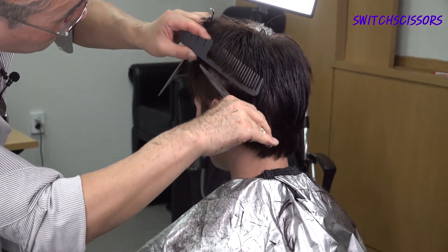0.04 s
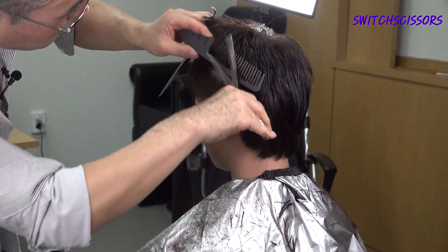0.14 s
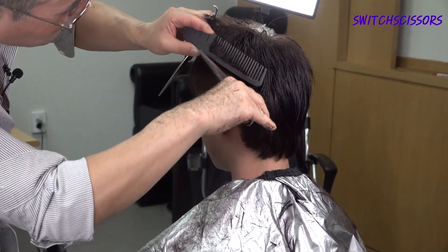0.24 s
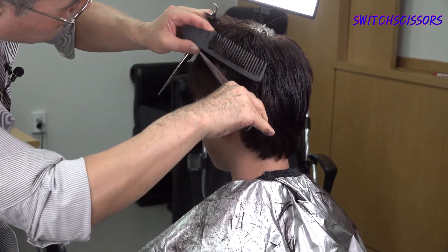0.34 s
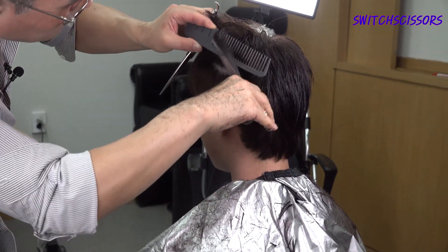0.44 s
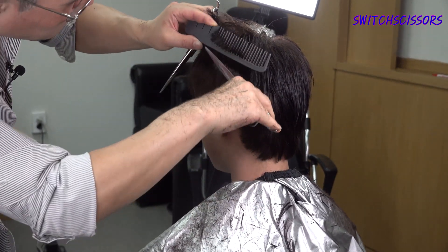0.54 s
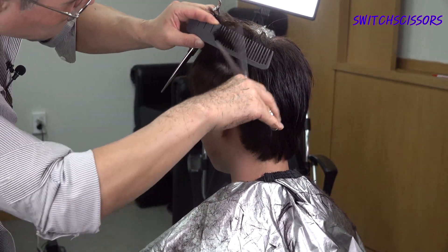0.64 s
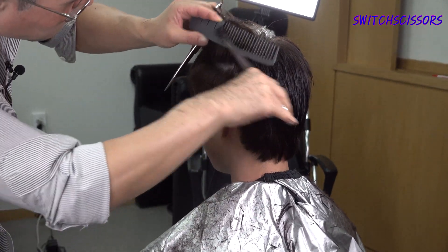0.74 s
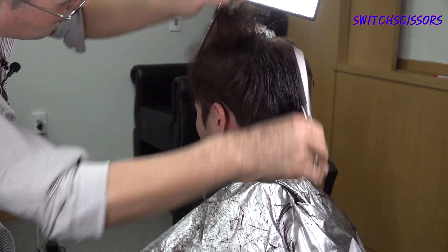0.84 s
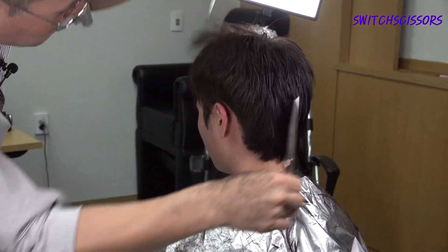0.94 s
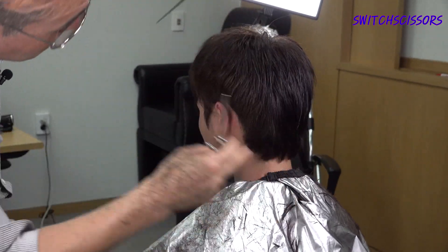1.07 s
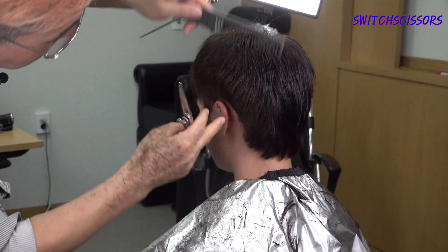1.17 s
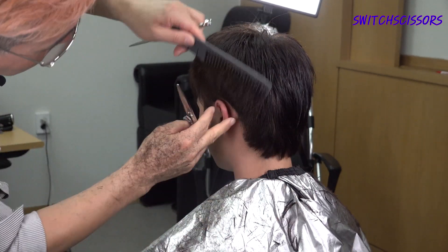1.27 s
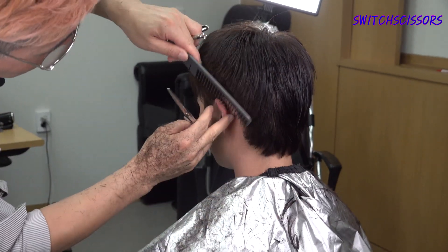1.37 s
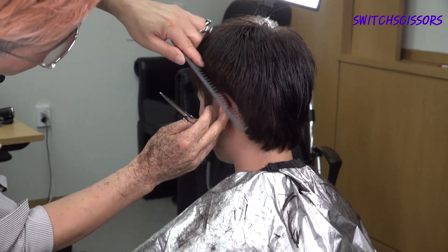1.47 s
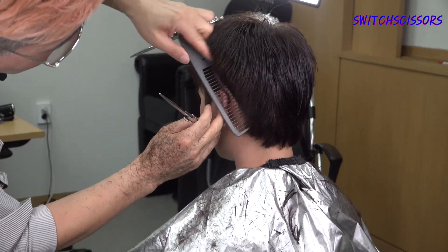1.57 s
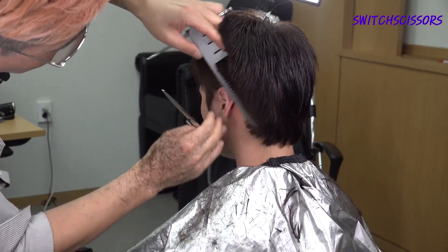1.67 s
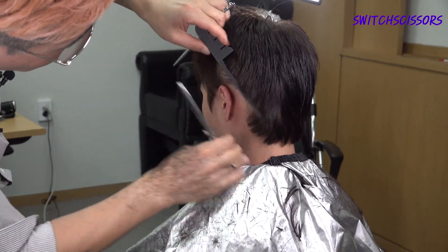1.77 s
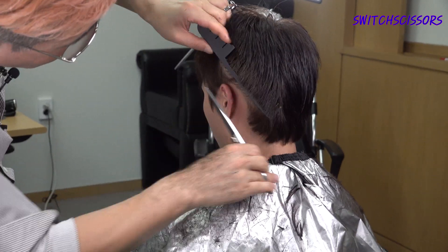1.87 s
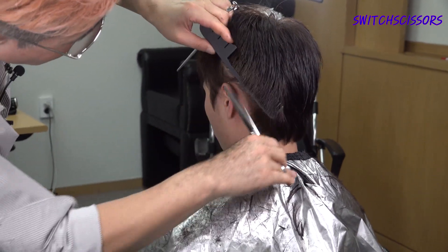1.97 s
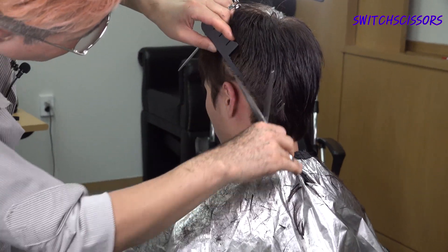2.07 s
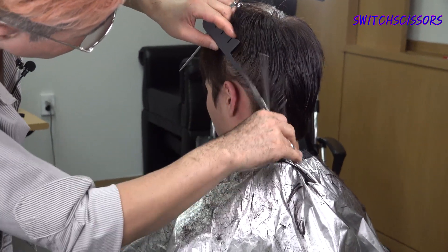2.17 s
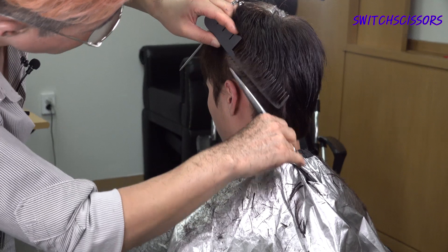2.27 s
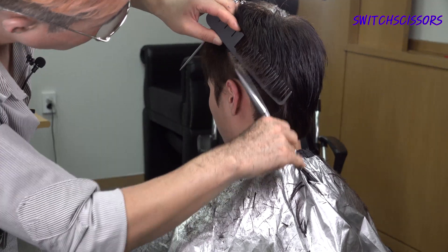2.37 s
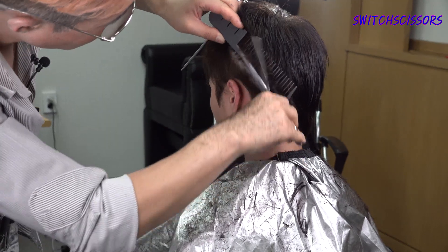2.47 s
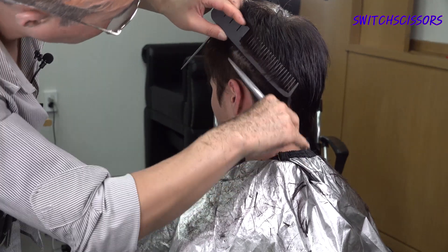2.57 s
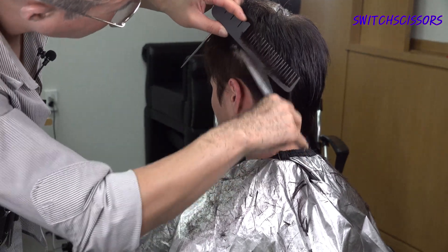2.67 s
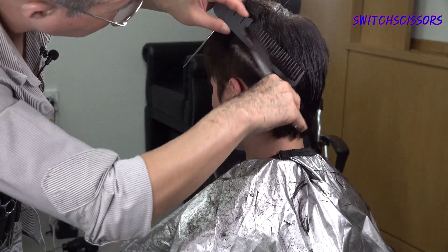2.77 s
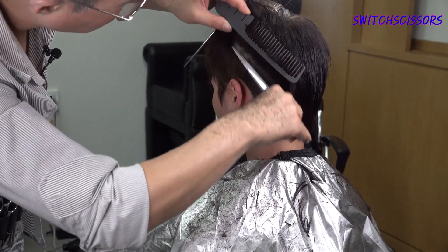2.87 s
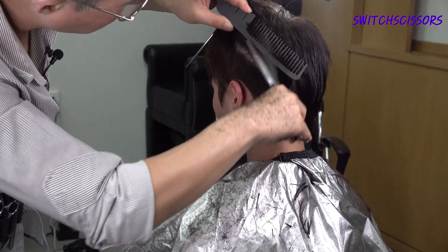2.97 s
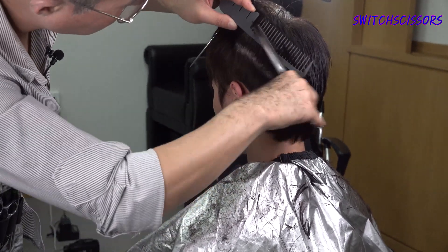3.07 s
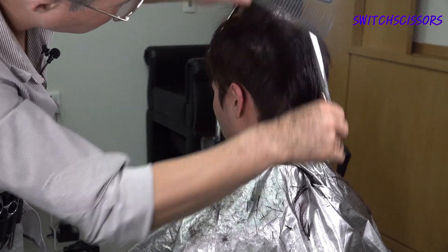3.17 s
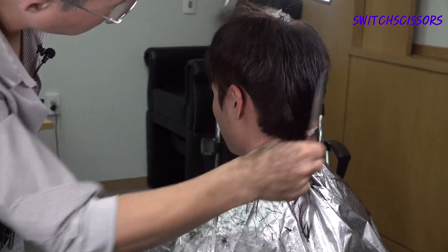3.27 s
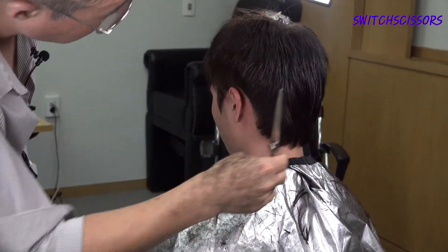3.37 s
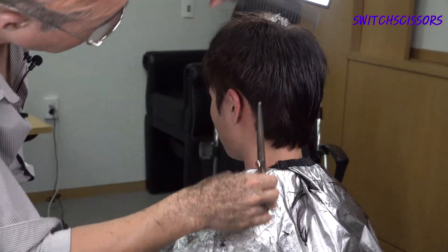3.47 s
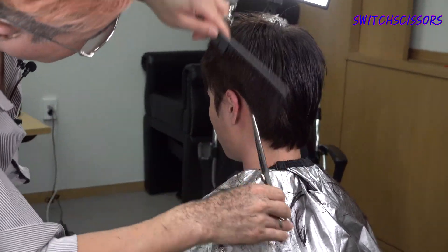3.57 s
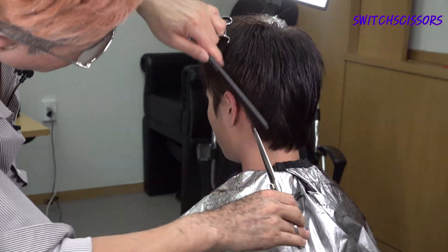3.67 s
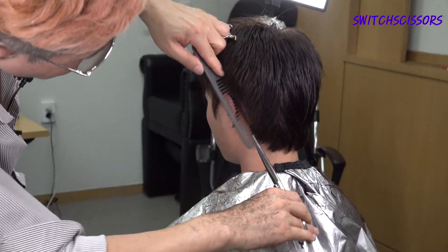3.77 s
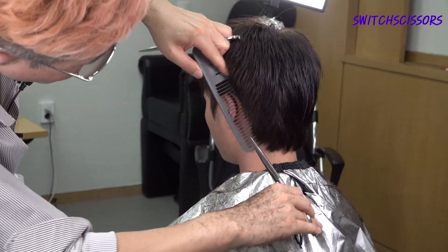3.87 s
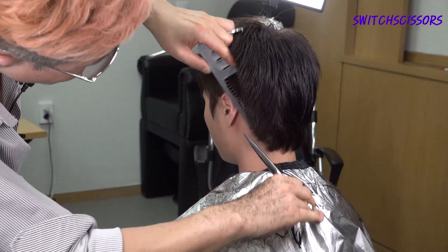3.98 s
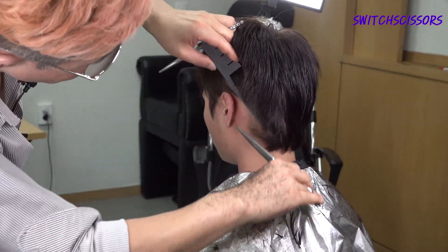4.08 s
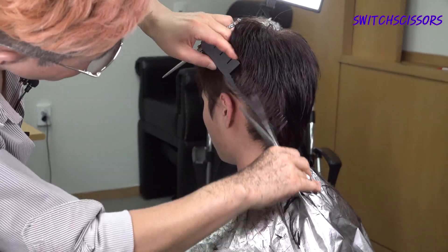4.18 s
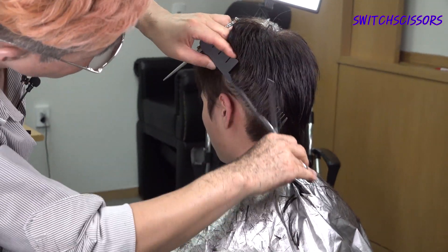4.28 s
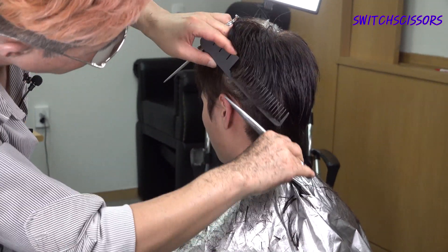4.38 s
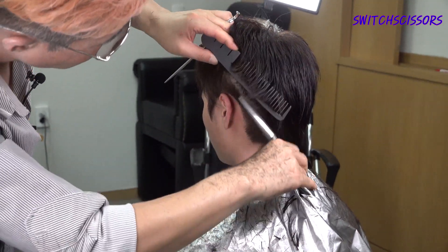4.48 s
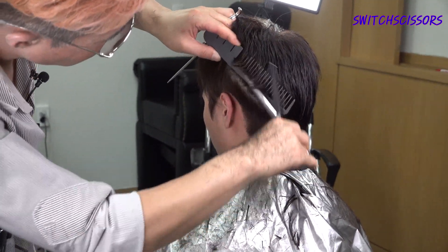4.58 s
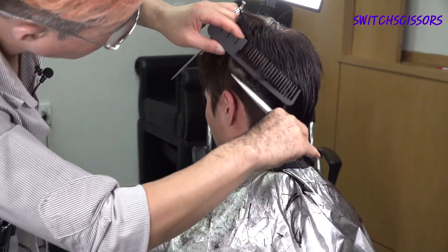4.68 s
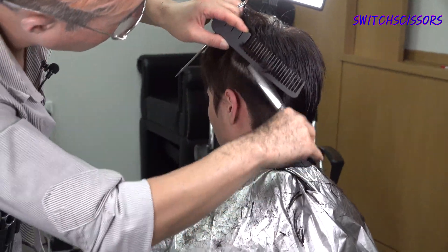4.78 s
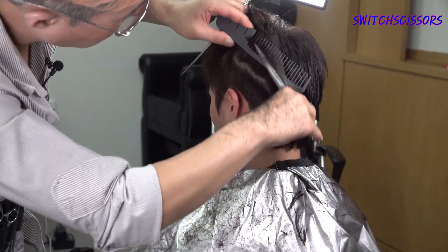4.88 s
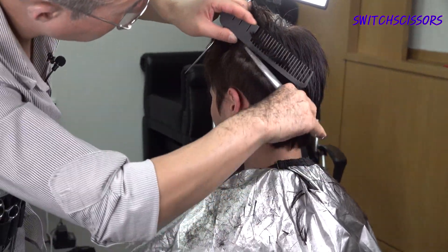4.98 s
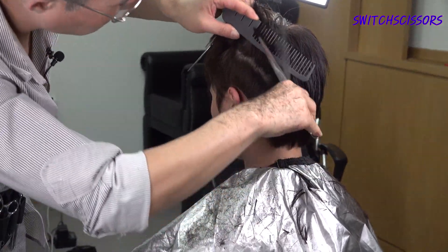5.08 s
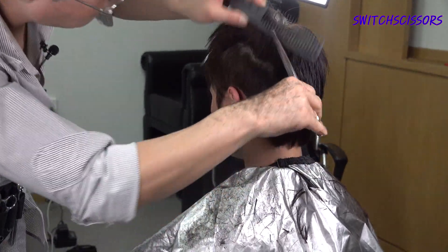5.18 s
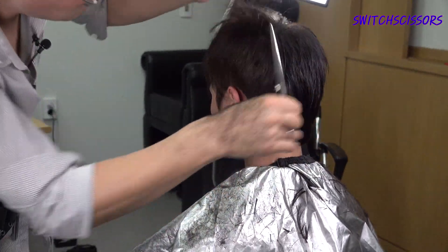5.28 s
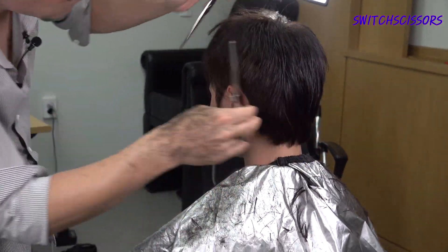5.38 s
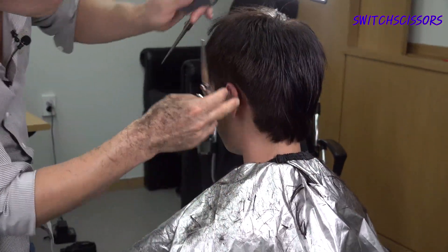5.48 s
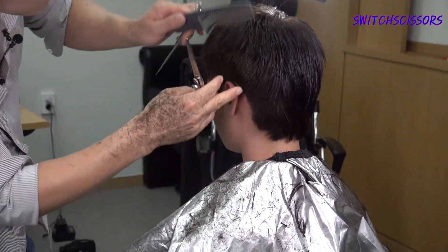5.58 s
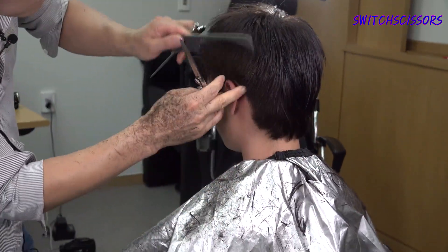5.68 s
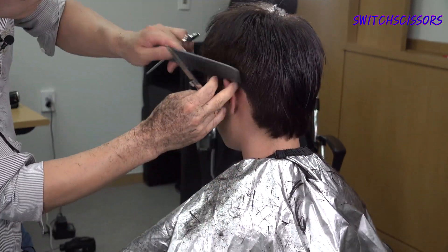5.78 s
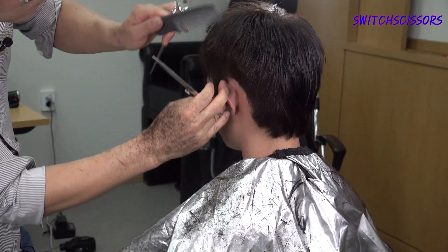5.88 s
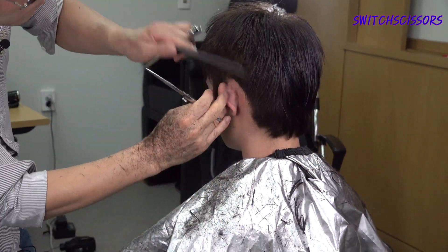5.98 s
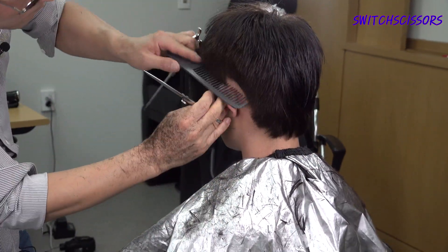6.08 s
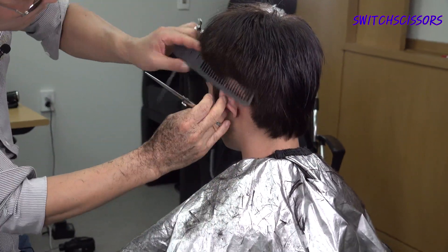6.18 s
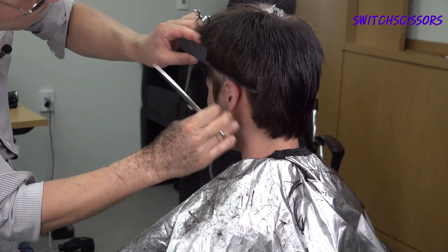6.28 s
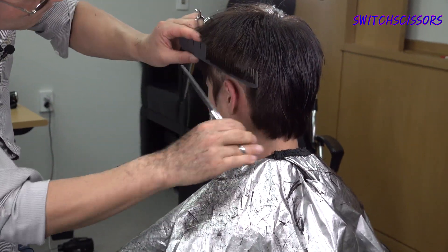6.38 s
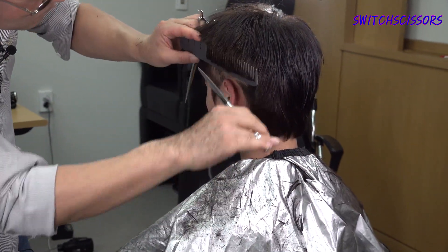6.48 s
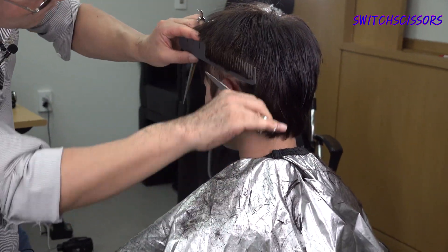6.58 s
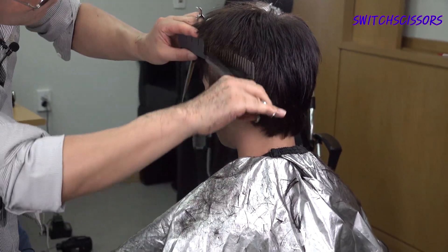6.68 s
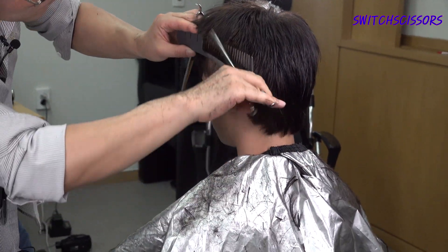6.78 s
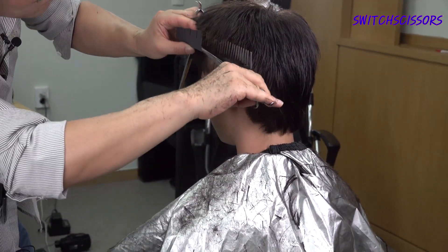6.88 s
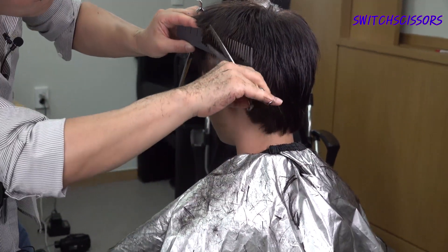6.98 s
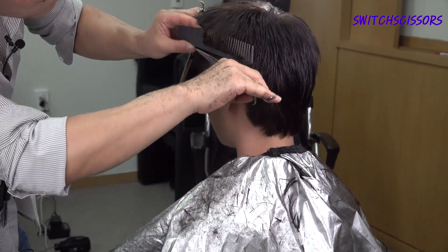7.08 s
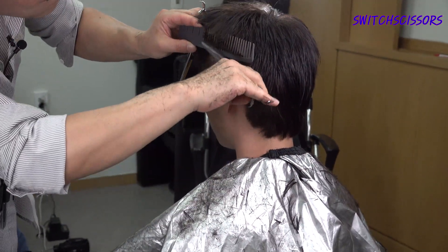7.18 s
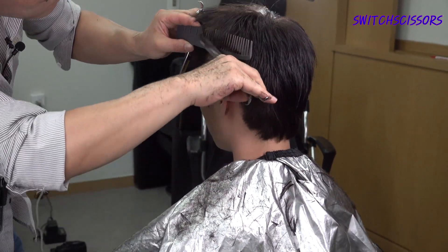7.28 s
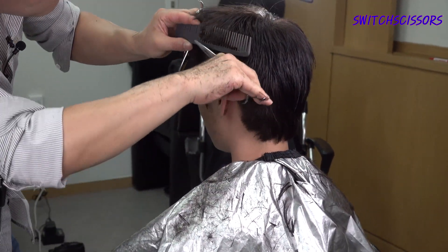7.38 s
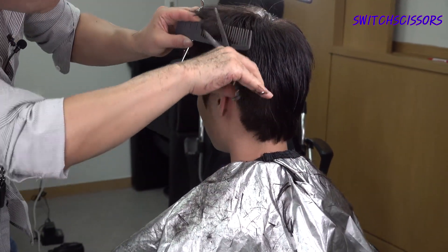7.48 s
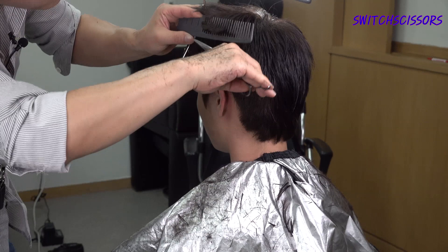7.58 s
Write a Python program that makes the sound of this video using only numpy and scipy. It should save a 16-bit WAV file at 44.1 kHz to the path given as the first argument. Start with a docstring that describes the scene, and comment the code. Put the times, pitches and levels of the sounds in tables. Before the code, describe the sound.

Close, bright steel blades squeak open, crunch hair and clack shut in quick four-snip bursts, each snip repeating faintly in a quiet reverberant room.

```python
"""Scissors over a comb

A barber snips hair in four quick runs, close to the microphone in a quiet room. Blades squeak open as
slips ring the steel, crunch through hair as random grains swell, and clack shut on noise-struck modes.
Each snip has a clear echo 47 ms later and a boxy repeat after 0.2 s, as from a small loudspeaker.
Comb and fingers rustle and tap faintly as filtered noise and clicks, over a sine-wave mains hum and soft hiss."""
import sys
import numpy as np
from scipy import signal
from scipy.fft import rfft, irfft
from scipy.io import wavfile

SR = 44100
rng = np.random.default_rng(int(sys.argv[2]) if len(sys.argv) > 2 else 0)


def transcribe(signal):
    """Save signal, clipped to [-1, 1], as a 16-bit WAV file at the path in sys.argv[1]."""
    frames = np.atleast_2d(signal).T
    limited = np.clip(frames, -1, 1)
    pcm = np.round(limited * 32767).astype(np.int16)
    wavfile.write(sys.argv[1], SR, pcm)


N = 336924  # length [samples]
SHORT = np.arange(2048) / SR  # time axis of one short sound [s]

# Mains harmonics: (frequency [Hz], rms level [dB])
HUM_HARMONICS = [(60, -73), (240, -79), (360, -71.5), (480, -72.5), (600, -76)]
# Colour of ventilation rumble and microphone hiss: (frequency [Hz], relative density [dB per Hz])
AIR_COLOUR = [(20, 6.5), (60, 6), (130, 1), (300, -4), (700, -11), (2000, -17.5), (7000, -20), (13500, -19),
              (15500, -17.5)]
# Colour of the soft hiss that widens the stereo: (frequency [Hz], relative density [dB per Hz])
SIDE_HISS_COLOUR = [(18, -33), (30, -1), (320, -11), (698, -14.5), (15000, -18)]
# Slight stereo width of the sound by frequency: (frequency [Hz], side gain relative to mid [dB])
STEREO_WIDTH = [(30, -21), (120, -33.5), (1400, -37.5), (3000, -56), (5500, -27), (8500, -71), (15000, -43)]
# Reverberation by band: (frequency [Hz], gain [dB], decay time t60 [s])
ROOM_BANDS = [(35, 10.5, 1.0), (98, 4, 0.98), (285, -2, 1), (1000, -0.5, 1), (3000, 0, 0.79),
              (7530, 3, 0.69), (10900, -4.5, 0.6), (16000, -2, 0.54)]
# Colour of the early echo: (frequency [Hz], gain [dB])
ECHO_COLOUR = [(60, 2.5), (250, 1), (1000, 1.5), (3500, -4.5), (7500, -1.5), (8500, -3.5), (11000, -2.5),
               (12300, -4), (14700, -3)]
# Colour of the boxy loudspeaker repeat: (frequency [Hz], gain [dB])
SPEAKER_COLOUR = [(60, 6), (250, 1), (620, 7.5), (800, 9.5), (940, 13), (1350, 3.5), (1550, 12), (1700, 15),
                  (2200, 6), (3150, 7), (5800, -1.5), (8400, -2.5), (9800, -8), (13300, -11.5),
                  (14600, -11.5)]
# Light contacts of comb, rings and fingers; the one at 1.389 s answers the tap just before it: (time [s], level
# [dB], centre frequency [Hz])
LIGHT_TAPS = [(1.342, -53.5, 3000), (1.389, -53, 1570), (2.012, -45.5, 1810), (3.04, -36.5, 2970),
              (4.121, -43, 490), (5.131, -37.5, 3440), (5.631, -42, 1430), (5.717, -43, 176),
              (5.984, -50.5, 1490), (6.063, -52, 3000)]
# Comb strokes through hair: (time of the middle [s], length [s], level [dB], centre frequency [Hz])
COMB_STROKES = [(1.72, .2, -65, 13000), (1.858, 0.15, -57.5, 1750), (2.039, .078, -50, 1890),
                (2.253, 0.077, -52.5, 1740), (4.283, .18, -53, 1030), (5.799, .35, -61, 457),
                (5.87, 0.32, -65.5, 1600), (6.198, .8, -67.5, 544), (6.2, .2, -62, 13000)]
# Blades opening: (time of the loudest moment [s], scrape level [dB])
BLADE_OPENINGS = [(0.1439, -21.5), (0.412, -16.5), (0.6517, -18), (2.026, -19), (2.4251, -14.5),
                  (2.7152, -21.5), (3.0073, -18.5), (4.205, -20.5), (4.5436, -19.5), (4.8308, -19),
                  (5.0976, -18), (6.7186, -16.5), (6.845, -23.5), (6.995, -18.5), (7.233, -19),
                  (7.4812, -14.5)]
# Steel edges sliding on each other: (frequency [Hz], bandwidth [Hz], relative level [dB])
EDGE_MODES = [(3620, 1280, -12), (4960, 420, -10), (6540, 76, 0.5), (8800, 240, -6.5), (10100, 220, -3),
              (11950, 930, -0.5), (11460, 500, 8), (12200, 240, 2), (15100, 670, 0)]
# Squeaks as the crossing point runs along the blades:
# (start frequency [Hz], end frequency [Hz], relative level [dB])
SQUEAK_GLIDES = [(11000, 12250, -3), (10300, 9300, -7)]
# Colour of parting hair, also of the opening hiss: (frequency [Hz], relative gain [dB])
CRUNCH_COLOUR = [(200, 8.5), (1000, -8.5), (2200, -10.5), (3700, -0.5), (5600, -4.5), (7000, 6.5),
                 (10000, 7), (12000, 18.5), (13800, -9), (15300, -0.5)]
# Colour of the first hard contact: (frequency [Hz], relative gain [dB])
CRACK_COLOUR = [(60, -17.5), (250, -8), (900, -7.5), (2300, -13.5), (4000, -6), (5200, -6.5), (5800, -13.5),
                (7000, -3), (9000, 1.5), (12000, 0), (15000, 3)]
# Steel blades struck shut: (multiple of the main ring [ratio], bandwidth [Hz], relative level [dB])
STRUCK_MODES = [(.43, 1280, -21.5), (0.883, 420, -18), (1.002, 247, 6), (1.16, 412, -1), (1.30, 404, 1),
                (1.365, 407, -4.5), (1.555, 550, 0.5), (1.70, 466, 3), (1.77, 550, -8)]
# Cuts, four to a run:
# (time of the stop [s], clack level [dB], handle thump level [dB], thump level fed to the echo [dB])
CUTS = [(0.0054, -20, -31, -47), (0.269, -21, -36, -51), (0.521, -22, -37.5, -32.5),
        (0.7732, -21, -37.5, -30.5), (2.2863, -19.5, -31, -30.5), (2.5709, -19, -45, -45),
        (2.8546, -20, -50, -32), (3.146, -20, -42, -31.5), (4.3942, -17.5, -28, -23),
        (4.6784, -19, -61, -36.5), (4.9546, -20, -31.5, -34), (5.2196, -19.5, -31, -31.5),
        (6.8931, -19, -35, -46), (7.0885, -18, -54, -49), (7.3446, -18.5, -32.5, -42),
        (7.5852, -19.5, -31, -26.5)]

AIR_DB, SIDE_HISS_DB = -55, -69  # rms levels
ECHO_S, SPEAKER_S = .04662, .2024  # delays
CABINET_S = 0.0017  # decay of the smear on the boxy repeat
OPENING_ECHO_DB, HANDLING_ECHO_DB = 1.5, -7  # sends to the echo
TOP_HZ = 15750  # top of the recorder's band
PAUSE_S = .6  # a longer gap between cuts starts a new run
FLICKS_PER_S, FLICK_DB, FLICK_SPREAD_DB, FLICK_HZ = 10, -46.5, 2, 2010  # comb teeth flicking free
# Strands snapping free, relative to the hiss of a stroke
STRANDS_PER_S, STRAND_DB, STRAND_SPREAD_DB = 170, 25.5, 1.5
RING_HZ, FIRST_RING_HZ = 8470, 8700  # main ring of the blades; higher on the first cut of a run
# The first cut of a run slides slowly into the hair; the lead counts from the middle of the slide
SLIDE_S, SLIDE_LEAD_S, SLIDE_DB, SLIDE_HZ = .07, .018, -49, 12100
# Hair crunch relative to the clack; each further cut of a run finds less hair left
CRUNCH_DB, CRUNCH_STEP_DB = -5.5, -1.03


def undb(db):
    """Decibels to gain."""
    return 10 ** (np.asarray(db) / 20)


def level(x, db, seconds):
    """Scale x to an rms level, counting its energy over so many seconds."""
    return x * undb(db) / np.sqrt(np.sum(x ** 2) / (seconds * SR) + 1e-18)


def unit(x):
    """Scale x to unit energy."""
    return x / np.sqrt(np.sum(x ** 2) + 1e-18)


def add(track, s, x):
    """Mix x into the track from time s, trimming whatever falls outside."""
    start = int(round(s * SR))
    x, start = x[max(-start, 0):], max(start, 0)
    track[start:start + len(x)] += x[:max(len(track) - start, 0)]


def through(x, response):
    """Play x through an impulse response."""
    return signal.fftconvolve(x, response)[:len(x)]


def along(f, hz, values):
    """Join points on a log-frequency axis."""
    return np.interp(np.log(f + 1), np.log(hz), values)


def colour(points, size=2048):
    """Minimum-phase impulse response with the given gains, so that no sound comes early."""
    gain_db = along(np.fft.rfftfreq(size, 1 / SR), *np.transpose(points))
    cepstrum = irfft(np.log(undb(gain_db)))
    # folding the cepstrum forward makes the response causal
    cepstrum[1:size // 2] *= 2
    cepstrum[size // 2 + 1:] = 0
    return irfft(np.exp(rfft(cepstrum)))


def band(x, hz, octaves):
    """Second-order band-pass around hz."""
    edges = np.clip(hz * 2 ** (np.array([-octaves, octaves]) / 2), 10, .47 * SR)
    return signal.sosfilt(signal.butter(2, edges, "band", fs=SR, output="sos"), x)


def steady(points, db):
    """Even noise with the given colour and rms level."""
    gain = undb(along(np.fft.rfftfreq(N, 1 / SR), *np.transpose(points)))
    return level(irfft(rfft(rng.standard_normal(N)) * gain, N), db, N / SR)


def grains(per_s, spread_db):
    """Random tiny slips of uneven size and either sign."""
    n = len(SHORT)
    hits = rng.random(n) < per_s / SR
    return hits * rng.choice([-1, 1], n) * undb(spread_db * rng.standard_normal(n))


def chatter(envelope, count=6):
    """A burst of tiny blows under an envelope, exciting all frequencies nearly evenly."""
    blows = grains(7400, 2.5) * envelope
    for _ in range(count):
        flat = irfft(np.exp(1j * np.angle(rfft(blows))))
        blows = flat * np.sqrt(envelope)
    return blows


def ring(modes, scatter_db):
    """Decaying steel modes; the contact point changes their balance a little every time."""
    hz, width, db = np.transpose(modes)[:, :, None]
    waves = np.sin(2 * np.pi * hz * SHORT) * np.exp(-np.pi * width * SHORT)
    sign = (-1) ** np.arange(len(modes))[:, None]
    gain = undb(db + scatter_db * rng.standard_normal(db.shape))
    return np.sum(sign * gain * width * waves, axis=0)


def runs():
    """Group the cuts into runs, parted by pauses."""
    cuts = np.array(CUTS)
    return np.split(cuts, np.flatnonzero(np.diff(cuts[:, 0]) > PAUSE_S) + 1)


def hum():
    """Mains harmonics as steady sines, each starting at a random phase."""
    t = np.arange(N) / SR
    return sum(np.sqrt(2) * undb(db) * np.sin(2 * np.pi * (hz * t + rng.random()))
               for hz, db in HUM_HARMONICS)


def air():
    """Ventilation rumble and microphone hiss: one bed of coloured noise."""
    return steady(AIR_COLOUR, AIR_DB)


def room(size=32768):
    """Diffuse noise tails, one for each band of the room, each with its own decay."""
    t, f = np.arange(size) / SR, np.fft.rfftfreq(size, 1 / SR)
    hz, db, t60 = np.transpose(ROOM_BANDS)
    shares = np.array([along(f, hz, one) for one in np.eye(len(hz))])
    bands = irfft(rfft(rng.standard_normal(size)) * shares)
    rate = np.log(1000) / t60[:, None]
    # the square root gives each tail equal energy before its gain
    gain = np.sqrt(2 * rate / SR) * undb(db[:, None])
    return np.sum(bands * np.exp(-rate * t) * gain, axis=0)


def reverberate(x, size=11000):
    """The hands keep moving, so every quarter second meets a new pattern of reflections."""
    out = np.zeros(N)
    for i in range(0, N, size):
        add(out, i / SR, signal.fftconvolve(x[i:i + size], room()))
    return out


def cabinet(x):
    """Smear clicks over a few milliseconds, as a small box does."""
    return through(x, unit(chatter(np.exp(-SHORT / CABINET_S), count=12)))


def tap(db, hz, tap_s=0.0018, tap_noise=0.22):
    """One dry, light contact: a click and a short noise decay through a band-pass."""
    contact = (SHORT == 0) + tap_noise * rng.standard_normal(len(SHORT)) * np.exp(-SHORT / tap_s)
    return level(band(contact, hz, octaves=1.76), db, 0.0042)


def rustle(length_s, db, hz):
    """Hair drawn past an edge: a swell of hiss with single strands snapping free."""
    n = int(length_s * SR)
    snaps = rng.random(n) < STRANDS_PER_S / SR
    strands = snaps * undb(STRAND_DB + STRAND_SPREAD_DB * rng.standard_normal(n))
    hairs = (rng.standard_normal(n) + strands) * np.hanning(n)
    return level(band(hairs, hz, octaves=1.66), db, length_s / 2)


def handling():
    """Taps and comb strokes; while the scissors work, teeth of the comb flick at random."""
    out = np.zeros(N)
    for s, db, hz in LIGHT_TAPS:
        add(out, s, tap(db, hz))
    for s, length_s, db, hz in COMB_STROKES:
        add(out, s - length_s / 2, rustle(length_s, db, hz))
    t = np.arange(N) / SR
    cutting = sum((t > run[0, 0]) & (t < run[-1, 0]) for run in runs())
    hits = cutting * (rng.random(N) < FLICKS_PER_S / SR)
    flicks = hits * undb(FLICK_SPREAD_DB * rng.standard_normal(N))
    return out + through(flicks, tap(FLICK_DB, FLICK_HZ))


def squeak(t, glide_s=0.00518, flutter_hz=1300, detune=0.0148):
    """Thin, unsteady whistles that glide apart, a little different on every stroke."""
    travel = .5 + .5 * np.tanh((t - .003) / glide_s)
    out = 0
    for start_hz, end_hz, db in SQUEAK_GLIDES:
        hz = start_hz + (end_hz - start_hz) * travel + flutter_hz * rng.standard_normal(len(t))
        cycles = np.cumsum(hz) * (1 + detune * rng.standard_normal()) / SR
        out = out + undb(db) * np.sin(2 * np.pi * cycles)
    return out


def openings(rise_s=0.0021, fall_s=0.0096, lead_s=.008, hiss_db=-7, squeak_db=-4):
    """Edge slides on edge in tiny slips that ring the blades."""
    out = np.zeros(N)
    t = SHORT - lead_s
    pressure = np.exp(np.minimum(t / rise_s, -t / fall_s))
    for s, db in BLADE_OPENINGS:
        slips = chatter(pressure, count=2)
        steel = unit(through(slips, ring(EDGE_MODES, scatter_db=1.0)))
        hiss = undb(hiss_db) * unit(through(slips, colour(CRUNCH_COLOUR)))
        whistle = undb(squeak_db) * unit(squeak(t) * pressure)
        add(out, s - lead_s, level(steel + hiss + whistle, db, 0.00064))
    return out


def thump(push_s=0.00018, rebound_s=0.0019, rebound=0.81):
    """The finger rings meet on their bumper: a short push and a slower rebound."""
    push, back = (SHORT / s ** 2 * np.exp(-SHORT / s) for s in (push_s, rebound_s))
    return push - rebound * back


def crunch(rise_s=0.0072, lead_s=.03, stop_s=0.00084):
    """Hairs part one after another, ever louder until the blades are shut."""
    t = SHORT - lead_s
    swell = np.exp(np.minimum(t / rise_s, -t / stop_s))
    return through(grains(7000, 4.3) * swell, colour(CRUNCH_COLOUR)), lead_s


def clack(ring_hz, chatter_s=0.00345, chatter_db=-11, crack_db=-1.0):
    """The blades hit their stop and chatter for a few milliseconds."""
    blows = level(chatter(np.exp(-(SHORT / chatter_s) ** 2)), 0, 1 / SR)
    modes = np.array(STRUCK_MODES) * [ring_hz, 1, 1]
    steel = unit(through(blows, ring(modes, scatter_db=2.0)))
    # the first contact is a sharp crack of its own
    crack = through((SHORT == 0) + undb(chatter_db) * blows, colour(CRACK_COLOUR))
    return steel + undb(crack_db) * unit(crack)


def closings():
    """Crunch and clack of every cut; the dull thumps of the handles, near and as echoed."""
    cuts, thumps, echoed_thumps = np.zeros((3, N))
    for run in runs():
        add(cuts, run[0, 0] - SLIDE_LEAD_S - SLIDE_S / 2, rustle(SLIDE_S, SLIDE_DB, SLIDE_HZ))
        for place, (s, clack_db, thump_db, echo_db) in enumerate(run):
            hair, lead_s = crunch()
            hair_db = clack_db + CRUNCH_DB + CRUNCH_STEP_DB * place
            ring_hz = RING_HZ if place else FIRST_RING_HZ
            add(cuts, s - lead_s, level(hair, hair_db, 0.0047))
            add(cuts, s, level(clack(ring_hz), clack_db, 0.0057))
            add(thumps, s, level(-thump(), thump_db, 0.0074))
            echoed = -thump(push_s=0.00026, rebound_s=0.0015, rebound=1.0)
            add(echoed_thumps, s, level(echoed, echo_db, 0.0031))
    return cuts, thumps, echoed_thumps


def scene(speaker_room_db=-2.5, handling_room_db=-7, scrape_room_db=-7, thump_room_db=-3,
          scrape_speaker_db=-7):
    """Scissors, their two repeats and the room, almost mono."""
    (cuts, thumps, echoed_thumps), scrapes, small = closings(), openings(), handling()
    echo, speaker = np.zeros((2, N))
    echoed = cuts + echoed_thumps + undb(OPENING_ECHO_DB) * scrapes + undb(HANDLING_ECHO_DB) * small
    add(echo, ECHO_S, through(echoed, colour(ECHO_COLOUR)))
    repeated = cuts + undb(scrape_speaker_db) * scrapes
    add(speaker, SPEAKER_S, through(repeated, colour(SPEAKER_COLOUR)))
    into_room = cuts + undb(thump_room_db) * thumps + undb(scrape_room_db) * scrapes
    into_room = into_room + undb(speaker_room_db) * speaker + undb(handling_room_db) * small
    close = cuts + thumps + scrapes + small
    mid = close + echo + cabinet(speaker) + reverberate(into_room) + air() + hum()
    # almost mono: a faint quarter-turned copy and a soft independent hiss give slight width
    width = undb(along(np.fft.rfftfreq(N, 1 / SR), *np.transpose(STEREO_WIDTH)))
    side = irfft(1j * width * rfft(mid), N) + steady(SIDE_HISS_COLOUR, SIDE_HISS_DB)
    return np.array([mid + side, mid - side])


def record(dry):
    """The recorder cuts the highest treble with a steep low-pass."""
    return signal.sosfilt(signal.ellip(10, .2, 70, TOP_HZ, fs=SR, output="sos"), dry)


dry = scene()
out = record(dry)
transcribe(out)
```